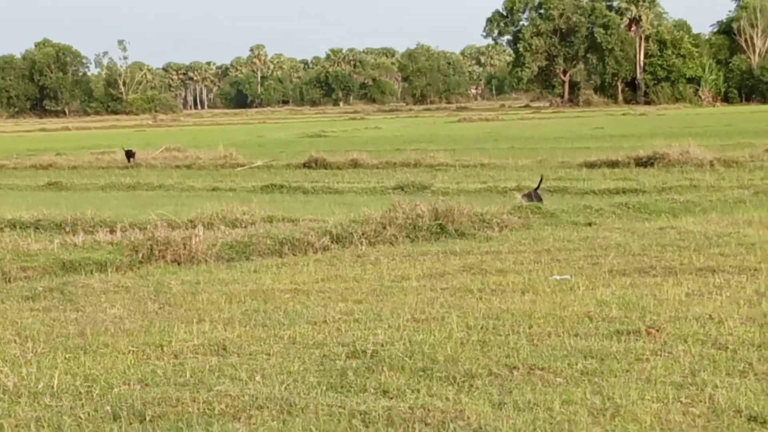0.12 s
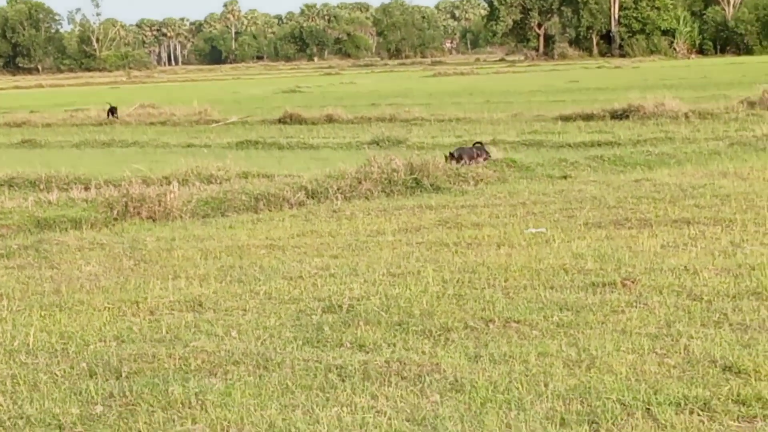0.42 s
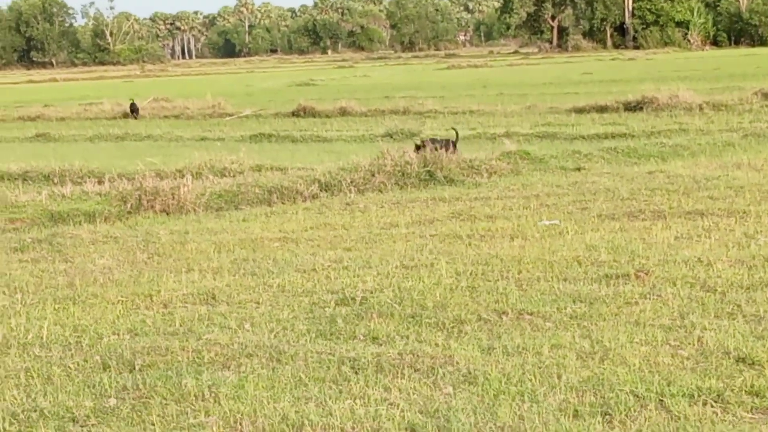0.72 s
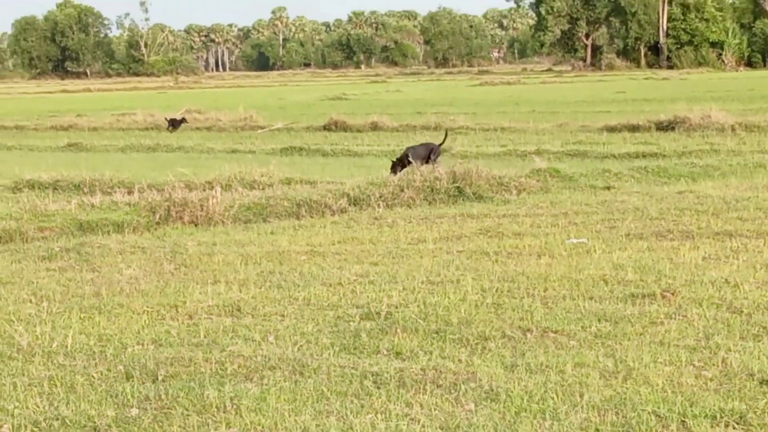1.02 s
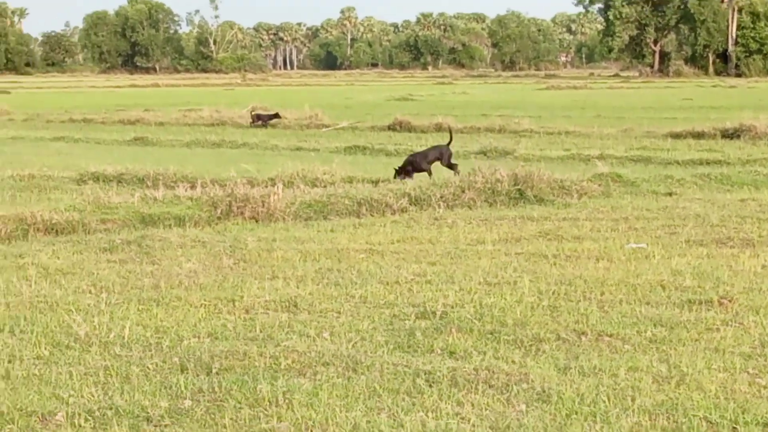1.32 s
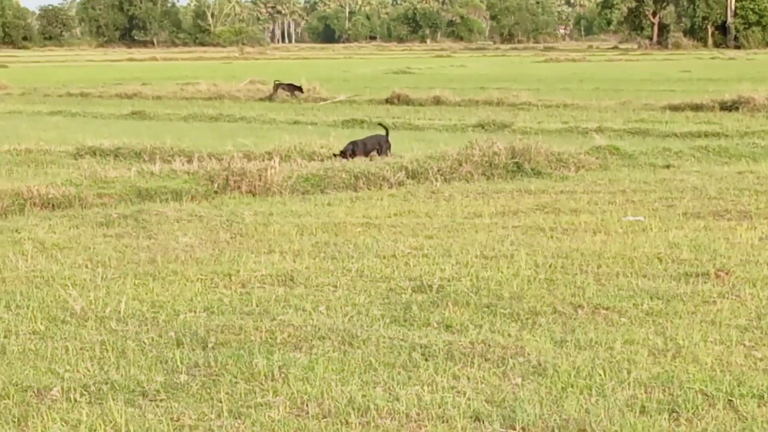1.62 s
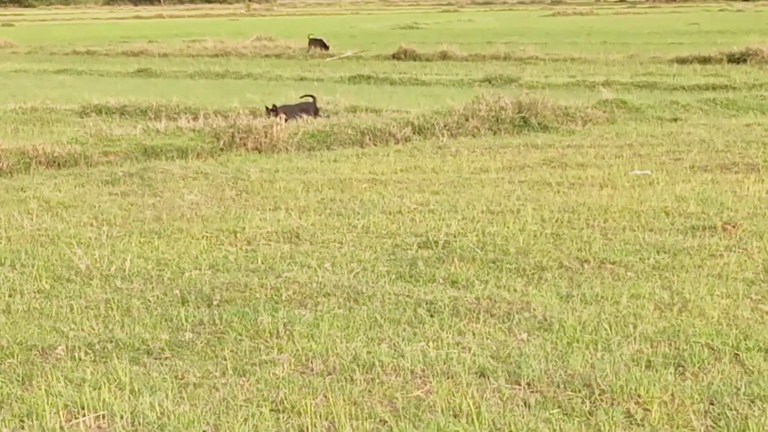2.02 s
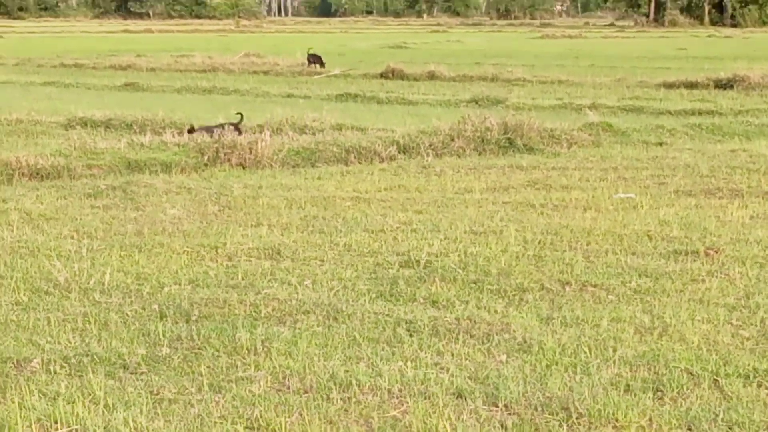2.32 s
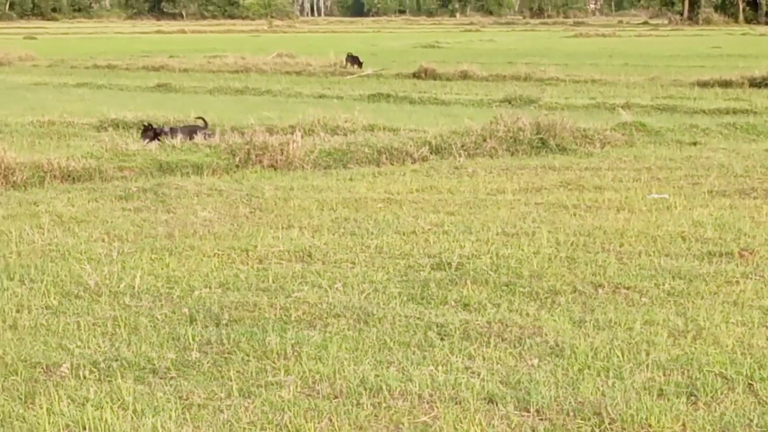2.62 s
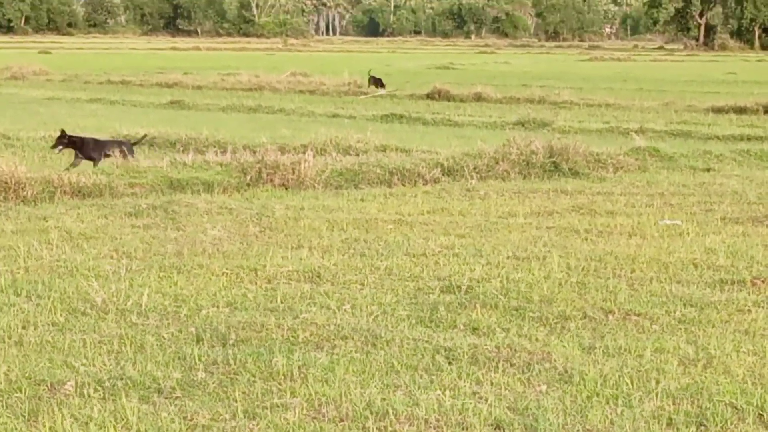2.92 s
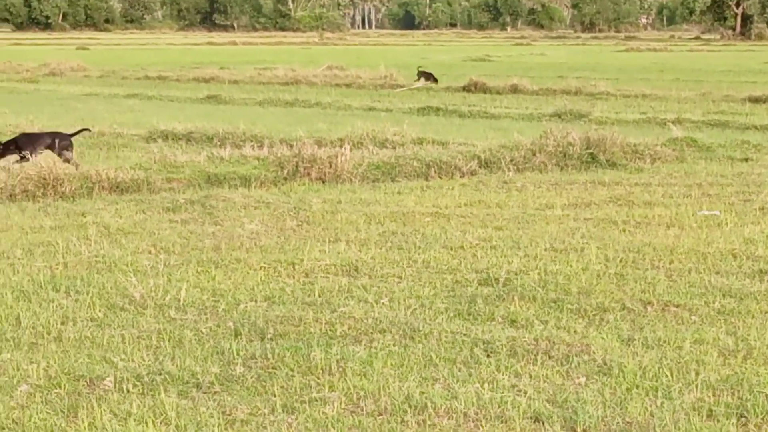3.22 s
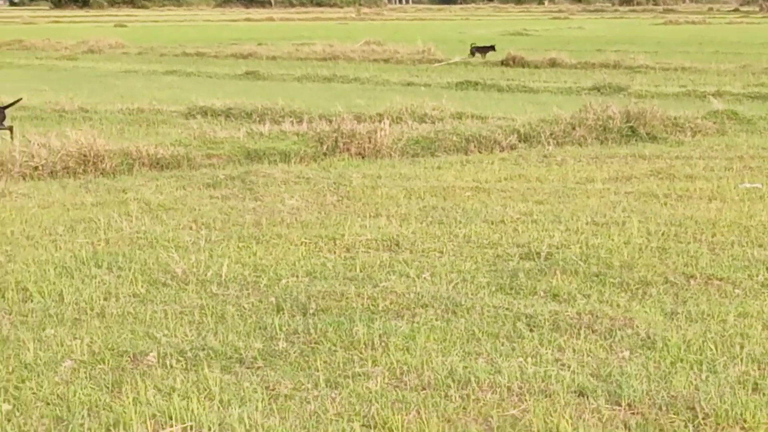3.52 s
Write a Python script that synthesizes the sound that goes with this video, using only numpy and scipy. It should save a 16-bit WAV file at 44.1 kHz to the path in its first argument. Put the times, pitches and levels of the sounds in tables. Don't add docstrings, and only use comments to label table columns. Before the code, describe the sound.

Low gusty wind thumping on the microphone, with bird trills, sharp chips and dry grass rustle

```python
import sys
import numpy as np
from scipy import signal
from scipy.io import wavfile
from scipy.ndimage import uniform_filter1d

SR = 44100
rng = np.random.default_rng(int(sys.argv[2]) if len(sys.argv) > 2 else 0)


def volts(x):
    e = np.asarray(x, float) / 20
    return 10 ** e


def unload_wav(signal):
    wavfile.write(
        sys.argv[1],
        SR,
        np.round(np.clip(np.atleast_2d(signal).T, -1, 1) * 32767).astype(np.int16),
    )


N = 163170

# frequency in Hz, gain in dB.
HISS_COLOUR = [(300, 3.5), (1200, 3.5), (3000, 2.5), (4800, 4.5), (6000, -5.5), (8000, -10.5), (9200, -20),
               (11500, -14)]
HISS_DB = -66
# time in seconds, level in dB.
DRONE_LEVEL = [
    (0, -81.5),
    (.8, -82.5),
    (1.15, -71.5),
    (1.9, -81.5),
]
DRONE_BAND_HZ = (8580, 9530)

# start in seconds, length in seconds, level in dB, start pitch in Hz, end pitch in Hz.
FAR_WHISTLES = [(0.41, 0.036, -55, 4430, 3080), (0.131, .055, -63, 2830, 2555),
                (0.169, 0.017, -69.5, 2170, 2150), (.235, 0.05, -72.5, 4540, 4600),
                (.545, 0.042, -67, 2950, 2890), (.55, 0.04, -64, 4024, 4130), (.5, 0.27, -75.5, 1833, 1753),
                (0.698, 0.06, -71.5, 2650, 2730), (.755, .04, -66, 4950, 4760),
                (1.07, 0.043, -67.5, 2800, 2700), (1.244, 0.028, -67, 2660, 2740),
                (1.381, 0.039, -63.5, 2700, 2637), (2.186, 0.012, -56.5, 2820, 2660),
                (2.244, 0.024, -59, 2800, 2900), (2.827, 0.035, -67.5, 2675, 2670),
                (3.088, .075, -61.5, 4200, 4610), (3.068, .025, -70, 5680, 5700),
                (2.963, 0.055, -60.5, 3780, 3370), (0.722, 0.041, -61.5, 3830, 3730),
                (0.888, 0.07, -63.5, 2920, 2980), (1.013, 0.052, -55.5, 4700, 3450),
                (1.513, 0.086, -66, 2923, 2920), (1.633, 0.028, -58, 3980, 3810),
                (1.992, 0.058, -63, 2796, 2460), (2.096, 0.039, -50, 4600, 3685),
                (2.522, 0.056, -61.5, 4300, 3750), (2.531, 0.061, -61, 3085, 2925),
                (2.738, 0.035, -54.5, 5000, 3300), (2.755, 0.021, -57, 5000, 4000),
                (2.765, 0.022, -68, 3080, 3040), (3.172, 0.022, -68, 2620, 2680),
                (3.29, 0.065, -66, 2900, 2900), (3.278, 0.0092, -62, 7600, 6800)]
# start in seconds, length in seconds, level in dB, low note in Hz,
# high note in Hz, swaps per second.
FAR_WARBLE = (.328, .1, -59, 2350, 2980, 46)
BUZZ_PER_HZ = 0.00025
CHATTER_DB, CHATTER_HZ = -77, (2300, 5300)
FIELD_T60_S, FAR_WET_DB = 0.28, -2.5

# time in seconds, level in dB.
RUSTLE_EFFORT = [(0, -83.5), (.95, -85.5), (1.15, -96), (1.38, -64), (1.49, -77.5), (1.65, -62),
                 (1.8, -68.5), (2.12, -75), (2.27, -59), (2.4, -65.5), (2.85, -76.5), (2.93, -68),
                 (3.2, -78.5), (3.55, -65.5), (3.7, -69.5)]
# frequency in Hz, gain in dB.
GRASS_COLOUR = [(1500, -29), (4500, 0.5), (7700, -19.5), (8300, -13), (9200, 6), (10400, 2), (12100, -10),
                (15500, -17.5)]
# frequency in Hz, gain in dB.
SWEEP_COLOUR = [(600, -4), (4500, 3), (7000, -8.5), (15500, -12)]
SWEEP_CENTRE_S, SWEEP_HALF_WIDTH_S, SWEEP_DB = 2.238, 0.068, -56
SWEEP_TAIL = 2.4
PATCH_DB, CRACKLE_DB = 2.8, 1
# time in seconds, peak in dB.
STALK_SNAPS = [(0.687, -60), (1.11, -56), (1.37, -53), (1.3793, -51), (1.5943, -54), (1.6446, -45),
               (2.176, -62), (2.202, -56), (2.2323, -47), (2.607, -52), (2.648, -53), (3.1368, -60),
               (3.271, -55), (3.3333, -58), (3.36, -60), (3.5743, -63), (3.6321, -78), (1.866, -66),
               (2.494, -47), (2.9234, -50), (3.004, -40), (3.4255, -51), (3.466, -48), (3.494, -46)]
# frequency in Hz, gain in dB.
SNAP_COLOUR = [(2000, -27), (7800, -24), (9300, 9), (12000, -5.5), (15500, -3.5)]

# start in seconds, length in seconds, peak in dB, start pitch in Hz, top pitch in Hz.
TRILL_SYLLABLES = [(0.0, 0.017, -34.5, 3910, 5730), (.063, 0.023, -38.5, 3770, 5700),
                   (1.118, 0.033, -47, 4430, 4800), (1.141, 0.015, -33.5, 4200, 5860),
                   (1.168, .011, -29, 4430, 5030), (1.191, 0.025, -28, 3865, 5565),
                   (1.256, 0.019, -27, 3636, 5540), (1.323, .019, -35, 4250, 5360),
                   (1.872, 0.02, -42, 4080, 5580), (1.900, 0.023, -36.5, 4310, 5350),
                   (1.924, 0.025, -33.5, 3740, 5700), (1.989, 0.028, -36, 3600, 5700),
                   (2.054, 0.021, -33, 3830, 5530)]
TRILL_END_HZ, TRILL_FLOOR_HZ = 4300, 3750
TRILL_PEAK_AT, SYLLABLE_SHAPE, TOP_DIP, RASP = 0.58, 1.1, 0.6, 0.5
OVERTONE_DB, TRILL_WET_DB = -21, -7

# time in seconds, peak in dB.
CHIP_CALLS = [(0.0964, -43), (0.2271, -45.5), (0.7617, -56.5), (0.8903, -52.5), (1.4383, -55),
              (1.57, -59.5), (2.073, -54.5), (2.205, -52.5), (2.7191, -41), (2.8556, -44.5), (3.391, -48),
              (3.5268, -43.5)]
CHIP_HZ, CHIP_S, CHIP_RISE, CHIP_WET_DB = 6920, 0.009, 0.2, -25
CHIP_TICK_HZ, CHIP_TICK_DB, CHIP_TICK_S, CHIP_LEAD_S = 4960, 2.5, 0.00075, 0.0008

# time in seconds, peak in dB.
EDDY_SLAPS = [(0.201, -58), (0.245, -43), (0.393, -53), (0.448, -14.5), (0.576, -39), (0.868, -33.5),
              (1.385, -41), (1.416, -30.5), (1.785, -38), (1.806, -29), (1.877, -50), (1.891, -42),
              (1.91, -27), (1.983, -31), (2.492, -49), (2.727, -58), (2.93, -40), (3.021, -53),
              (3.144, -56), (3.188, -49), (3.274, -41), (3.397, -30), (3.44, -34)]
# frequency in Hz, gain in dB.
SLAP_SPECTRUM = [(50, -27), (150, 1.5), (350, -4.5), (700, -24), (1400, -44.5), (3000, -76)]
SLAP_DB = 3

# centre in seconds, width in seconds, peak in dB.
BUFFETS = [(0.207, 0.044, -27.5), (0.249, 0.035, -17.5), (0.398, 0.0099, -8), (0.459, 0.049, -7),
           (0.582, 0.026, -11), (0.643, 0.018, -23), (0.681, 0.037, -20.5), (0.819, 0.027, -23.5),
           (0.879, 0.056, -23), (0.941, 0.039, -23), (1.055, 0.019, -27.5), (1.159, 0.034, -20),
           (1.289, 0.038, -19.5), (1.422, 0.059, -18.5), (1.496, 0.011, -25.5), (1.685, 0.047, -22.5),
           (1.757, 0.09, -37), (1.82, 0.035, -14), (1.912, 0.084, -14.5), (2.008, 0.023, -16),
           (2.128, 0.012, -25.5), (2.194, 0.056, -35), (2.309, 0.039, -32), (2.381, 0.0063, -25.5),
                (2.494, 0.051, -25), (2.527, 0.012, -21.5), (2.558, 0.019, -18), (2.593, 0.029, -22),
                (2.733, 0.053, -24.5), (2.828, 0.094, -25), (2.876, 0.039, -25), (2.946, 0.096, -24),
                (3.024, 0.035, -24), (3.081, 0.015, -28.5), (3.147, 0.06, -26.5), (3.203, 0.069, -26),
                (3.299, 0.03, -30), (3.4, 0.048, -17.5), (3.444, 0.025, -22.5), (3.564, 0.012, -21.5)]
# time in seconds, level in dB, edge share in dB.
BREEZE_LEVEL = [(0, -40.5, -11.5), (0.248, -35.5, -4), (0.482, -41, -8.5), (0.551, -40.5, -19.5),
                (.9, -49, -21), (1.02, -56.5, -17), (1.45, -37.5, -16), (1.599, -46.5, -17),
                (1.962, -31.5, -10.5), (2.069, -54.5, -24), (2.65, -44.5, -10.5), (2.9, -40, -8.5),
                (3.2, -40, -3.5), (3.7, -38.5, -10)]
# frequency in Hz, gain in dB.
BODY_COLOUR = [(25, -37.5), (45, -19), (70, -4.5), (110, 4.5), (160, 0), (240, -4.5), (330, -13.5),
               (900, -100)]
# frequency in Hz, gain in dB.
EDGE_COLOUR = [(100, -24), (220, 5.5), (320, 3.5), (450, -8), (620, -18), (800, -29.5), (1300, -50.5),
               (3000, -100)]
RISE_SHARE, GUST_STRETCH, GUST_DB = 0.4, 1.583, -5
LUMPS_DB, LUMP_S, STEADY_S = 5, 0.0035, 0.017
EDGE_DB, EDGE_GROWTH, PORT_HZ = -0.5, 0.19, 56
MIC_EDGE_HZ = 15750


def evened(x):
    return x / np.sqrt(np.mean(x ** 2) + 1e-20)


def curve(points):
    s, value = np.transpose(points)
    return np.interp(np.arange(N) / SR, s, value)


def colour(x, points):
    f, db = np.transpose(points)
    log_hz = np.log(np.fft.rfftfreq(8192, 1 / SR) + 1)
    log_gain = np.log(volts(np.interp(log_hz, np.log(f), db)))
    full = np.r_[log_gain, log_gain[-2:0:-1]]
    taps = np.fft.ifft(np.exp(np.conj(signal.hilbert(full)))).real[:6000]
    return signal.oaconvolve(x, taps / np.linalg.norm(taps))[:N]


def drift(span_s):
    size = max(round(span_s * SR), 2)
    once = uniform_filter1d(rng.standard_normal(N), size)
    return evened(uniform_filter1d(once, size))


def add(mix, s, sound):
    part = mix[max(round(s * SR), 0):][:len(sound)]
    part += sound[:len(part)]


def glide(hz):
    return 2 * np.pi * np.cumsum(hz) / SR


def field(x):
    taps = np.zeros(SR // 2)
    at = np.arange(80, SR // 2 - 20, 20) + rng.integers(0, 20, (SR // 2 - 81) // 20)
    taps[at] = rng.standard_normal(len(at)) * volts(-60 * at / SR / FIELD_T60_S)
    return signal.oaconvolve(x, taps / np.linalg.norm(taps))[:N]


def hiss():
    band = signal.butter(2, DRONE_BAND_HZ, 'band', fs=SR, output='sos')
    drone = evened(signal.sosfilt(band, rng.standard_normal(N)))
    drone = drone * volts(curve(DRONE_LEVEL) + 3 * drift(0.01))
    air = rng.standard_normal(N) * volts(HISS_DB + 1.5 * drift(0.0042))
    return drone + colour(air, HISS_COLOUR)


def chatter(count):
    s, length, size, pitch, bend = rng.random((count, 5)).T
    hz = CHATTER_HZ[0] * (CHATTER_HZ[1] / CHATTER_HZ[0]) ** pitch
    db = CHATTER_DB + 7 * size ** 2
    return list(zip(s * (N / SR - 0.1), 0.015 + 0.04 * length, db, hz, hz * (1 - 0.2 * bend)))


def warble():
    _, length, db, low_hz, high_hz, rate = FAR_WARBLE
    t = np.arange(0, length, 1 / SR)
    high_on = (t * rate % 1 > 0.38) | (t * rate > 4)
    up = uniform_filter1d(high_on * 1., 200)
    high = up * np.sin(2 * np.pi * high_hz * t)
    low = 0.93 * (1 - up) * np.sin(2 * np.pi * low_hz * t)
    return volts(db) * np.sin(np.pi * t / length) ** 0.5 * (high + low)


def whistles():
    out, buzz = np.zeros(N), drift(0.00082)
    for s, length, db, start_hz, end_hz in FAR_WHISTLES + chatter(count=60):
        u = np.arange(0, 1, 1 / (length * SR))
        share = min(BUZZ_PER_HZ * abs(end_hz - start_hz) + 0.15 + 0.15 * (start_hz > 3500), 0.55)
        voice = 1 - share + share * buzz[round(s * SR):][:len(u)]
        tone = np.sin(glide(start_hz + (end_hz - start_hz) * u ** 1.3))
        add(out, s, volts(db) * voice * np.sin(np.pi * u) ** 0.088 * tone)
    out = out * volts(2.5 * drift(0.01))
    out = out + volts(FAR_WET_DB) * field(out)
    add(out, FAR_WARBLE[0], warble())
    return out


def patchy(x, patch_db):
    z = signal.stft(x, nperseg=256)[2]
    patches = rng.standard_normal(z.shape[::-1]).T
    patches = uniform_filter1d(patches, size=5, axis=0)
    patches = evened(uniform_filter1d(patches, size=7, axis=1))
    return signal.istft(z * volts(patch_db * patches), nperseg=256)[1][:N]


def snapping():
    snaps = np.zeros(N)
    for s, db in STALK_SNAPS:
        add(snaps, s, volts(db + 13) * np.hanning(4))
    return colour(snaps, SNAP_COLOUR) + 0.32 * colour(snaps, SWEEP_COLOUR)


def grass():
    grains = patchy(rng.standard_normal(N), PATCH_DB)
    grains = grains * volts(3.0 * drift(0.001) + 1.8 * drift(0.012))
    rustle = colour(evened(grains) * volts(curve(RUSTLE_EFFORT)), GRASS_COLOUR)
    t = np.arange(N) / SR - SWEEP_CENTRE_S
    stroke = np.exp(-(t / (SWEEP_HALF_WIDTH_S * np.where(t > 0, SWEEP_TAIL, 1))) ** 2)
    crackle = evened(grains[::-1] * volts(CRACKLE_DB * drift(0.0045)))
    sweep = colour(crackle * volts(SWEEP_DB) * stroke, SWEEP_COLOUR)
    return rustle + sweep + snapping()


def trill():
    out = np.zeros(N)
    for s, length, db, start_hz, top_hz in TRILL_SYLLABLES:
        u = np.arange(0, 1, 1 / (length * SR))
        turn = glide(np.interp(u, [0, TRILL_PEAK_AT, 1], [start_hz, top_hz, TRILL_END_HZ]))
        dip = 1 - TOP_DIP * np.exp(-(6 * (u - TRILL_PEAK_AT)) ** 2)
        shape = np.sin(np.pi * u) ** SYLLABLE_SHAPE * dip
        voice = np.sin(turn) + volts(OVERTONE_DB) * (1 - u) * np.sin(2 * turn)
        add(out, s, volts(db + 1.5) * shape * voice)
    out = out * (1 - RASP + RASP * drift(0.0007))
    echoes = field(out * drift(0.002))
    beak = signal.butter(8, TRILL_FLOOR_HZ, 'high', fs=SR, output='sos')
    return signal.sosfilt(beak, out + volts(TRILL_WET_DB) * echoes)


def chips():
    out, u = np.zeros(N), np.arange(0, 1, 1 / (CHIP_S * SR))
    t = np.arange(-3 * CHIP_TICK_S, 3 * CHIP_TICK_S, 1 / SR)
    turn = glide(CHIP_TICK_HZ * (1 + 0.13 * t / CHIP_TICK_S))
    tick = np.exp(-(t / CHIP_TICK_S) ** 2) * (np.sin(turn) + volts(-14.5) * np.sin(2 * turn))
    bend_hz = CHIP_HZ * (0.96 + 0.05 * np.exp(-10 * u) + CHIP_RISE * u ** 2.5)
    shape = np.minimum(u / 0.039, 1) * np.clip((1 - u) / 0.082, 0, 1)
    note = shape * np.sin(glide(bend_hz))
    for s, db in CHIP_CALLS:
        add(out, s, volts(db) * note)
        add(out, s - CHIP_LEAD_S - 3 * CHIP_TICK_S, volts(db + CHIP_TICK_DB) * tick)
    return out + volts(CHIP_WET_DB) * field(out)


def slaps():
    out = np.zeros(N)
    for s, db in EDDY_SLAPS:
        add(out, s, volts(db + SLAP_DB) * rng.choice([-1, 1]) * np.hanning(31))
    return colour(out, SLAP_SPECTRUM)


def steadied(x):
    power = uniform_filter1d(x ** 2, round(STEADY_S * SR))
    return evened(x / (power + 0.04) ** 0.64)


def gust_push():
    push = volts(curve(np.array(BREEZE_LEVEL)[:, :2]))
    for centre, width, db in BUFFETS:
        u = np.arange(0, 1, 1 / (width * GUST_STRETCH * SR))
        swell = np.sin(np.pi / 2 * np.minimum(u / RISE_SHARE, (1 - u) / (1 - RISE_SHARE))) ** 2
        add(push, centre - RISE_SHARE * width * GUST_STRETCH, volts(db + GUST_DB) * swell)
    return push


def wind():
    push = gust_push()
    air = rng.standard_normal(N)
    edge_share = volts(curve(np.array(BREEZE_LEVEL)[:, ::2]))
    lumps = evened(volts(LUMPS_DB * drift(LUMP_S)))
    edge = push * (push / volts(-26.5)) ** EDGE_GROWTH * edge_share * lumps
    body = steadied(colour(air, BODY_COLOUR)) * push
    rumble = volts(-44.5) * drift(0.003)
    bright = volts(EDGE_DB) * colour(air * edge, EDGE_COLOUR)
    port = signal.butter(2, PORT_HZ, 'high', fs=SR, output='sos')
    return signal.sosfilt(port, body + rumble + bright)


def scene():
    return (wind() + grass() + hiss() + chips() + trill() + whistles() + slaps())[None]


def low_pass(x):
    return signal.sosfilt(signal.butter(12, 16550, fs=SR, output="sos"), x)


def record(dry):
    edge = signal.firwin(401, MIC_EDGE_HZ, window=("kaiser", 8), fs=SR)
    return low_pass(signal.oaconvolve(dry, edge[None], "same"))


dry = scene()
out = record(dry)
unload_wav(out)
```